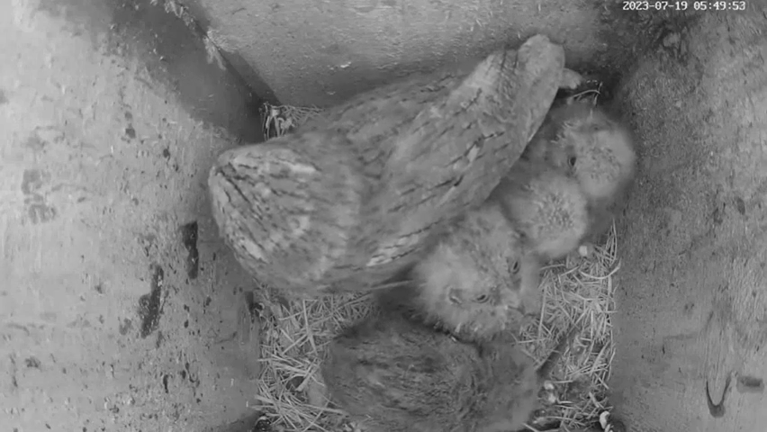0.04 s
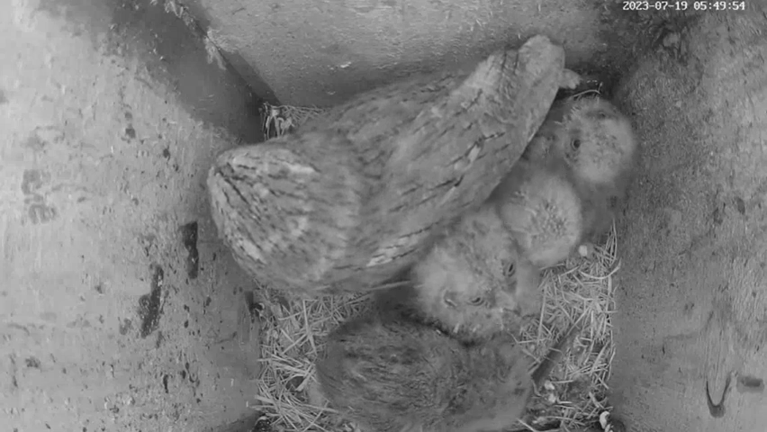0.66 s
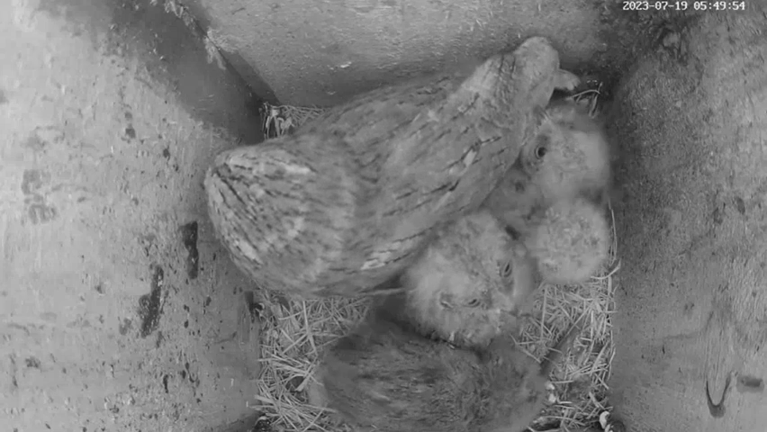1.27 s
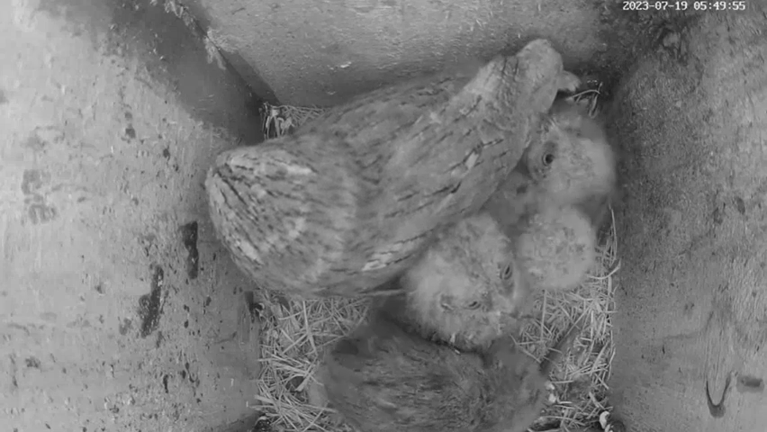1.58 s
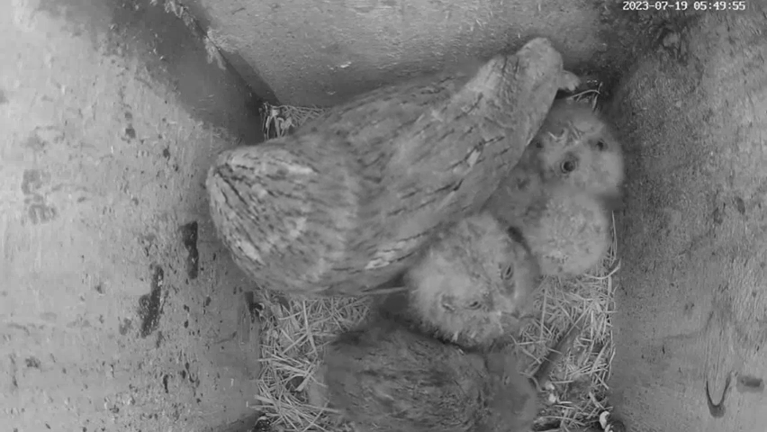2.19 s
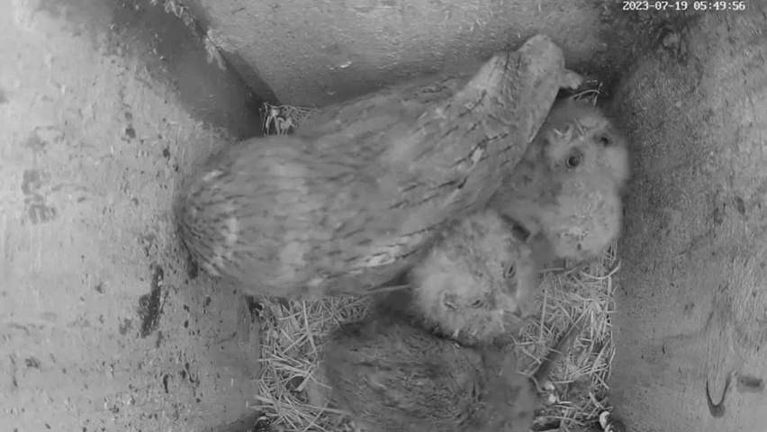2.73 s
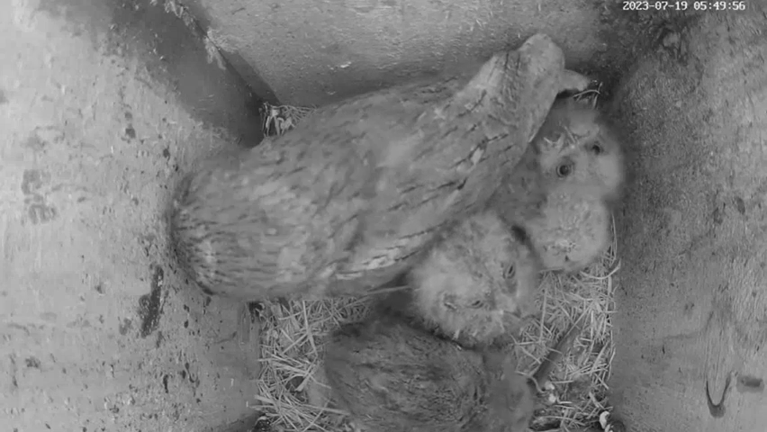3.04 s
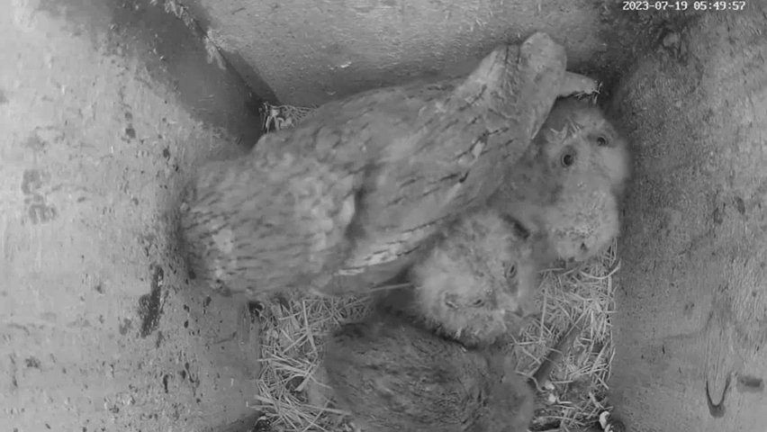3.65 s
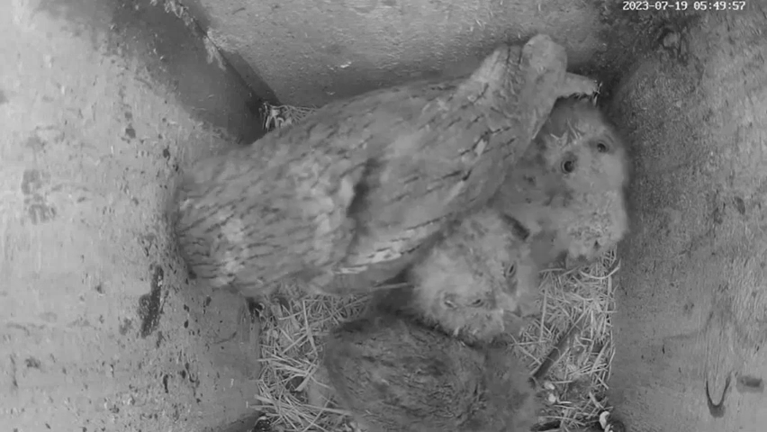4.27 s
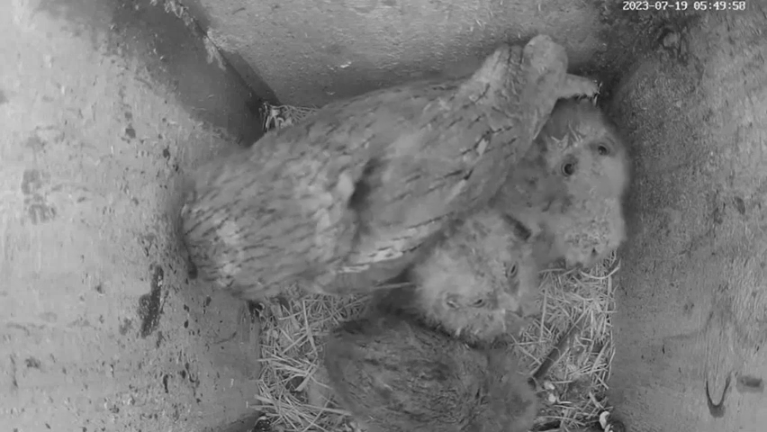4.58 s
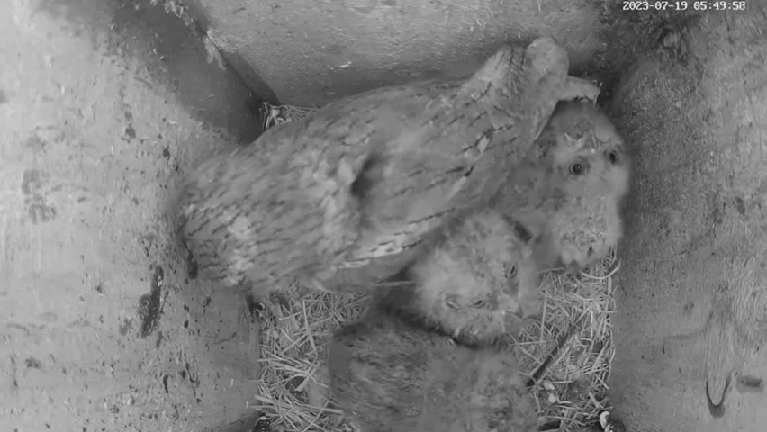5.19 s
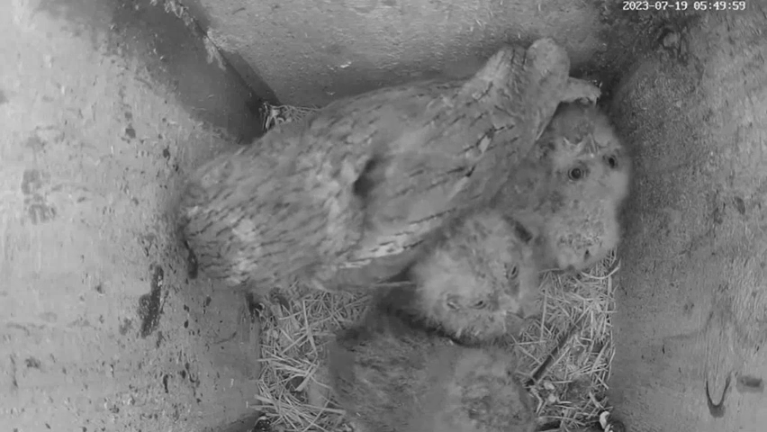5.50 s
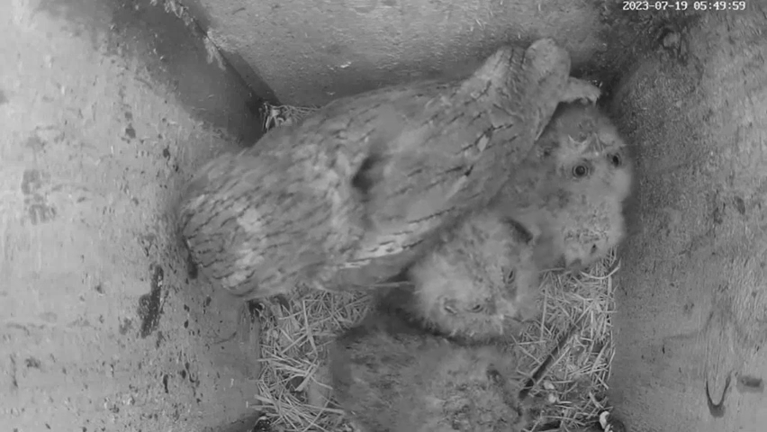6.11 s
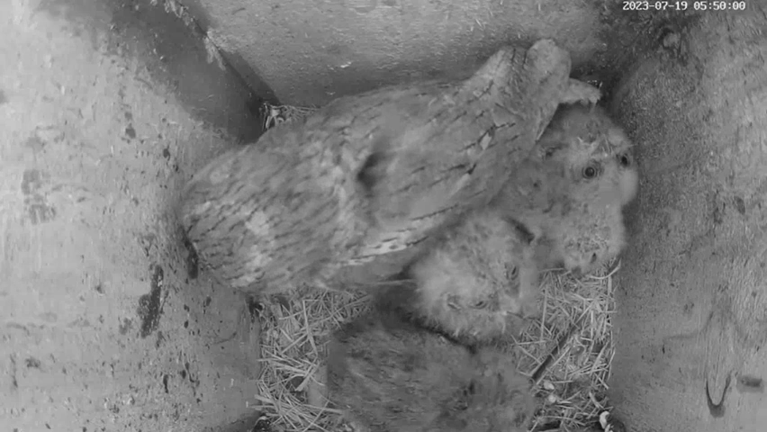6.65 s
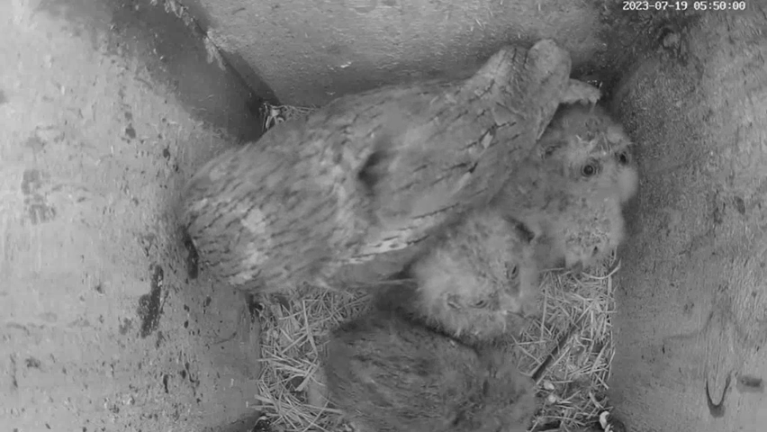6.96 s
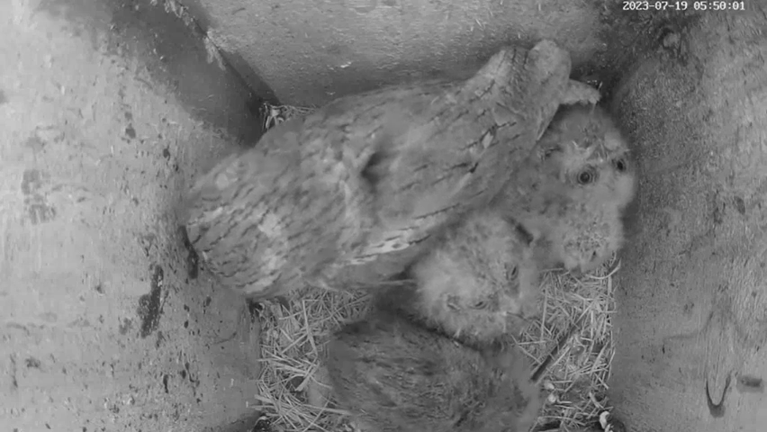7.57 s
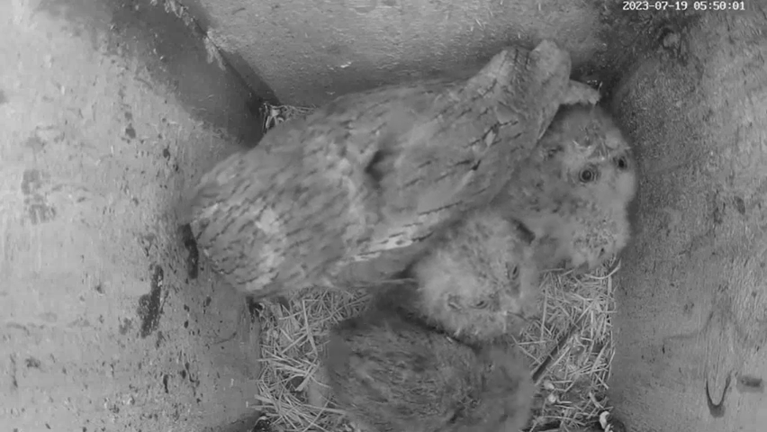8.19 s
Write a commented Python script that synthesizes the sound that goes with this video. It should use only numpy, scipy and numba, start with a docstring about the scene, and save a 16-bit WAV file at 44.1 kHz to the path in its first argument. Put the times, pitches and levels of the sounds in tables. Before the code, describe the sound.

Close inside a wooden nest box, owls step and shuffle on straw, making soft, low thumps through the boards. Chicks give brief raspy calls and thin peeps, two or three at a time, with pauses between the groups. The movement is strongest at first, settles in the middle and returns more lightly while the begging continues. A faint, steady microphone hiss lies underneath.

```python
"""Three owl chicks beg in a wooden nest box, close to a small camera microphone, over faint hiss.
First a gravelly, a shrill and a hoarse chick call in turn: uneven syrinx pulses ring the throat,
often clearing into a peep. Thin whistles arch between calls; steps bump the box, hardest near 1 s.
Two calls follow near 2 s, then the shuffling on the litter dies down. All three beg again from 3.7 s.
The steps pick up, two chicks call from 5.5 s, and a last round of all three starts at 7.3 s."""
import sys
import numpy as np
from scipy import signal
from scipy.fft import rfft, irfft
from scipy.io import wavfile
from scipy.ndimage import uniform_filter1d
from numba import njit

SR = 44100
rng = np.random.default_rng(int(sys.argv[2]) if len(sys.argv) > 2 else 0)


def unload_wav(signal):
    """Save mono or channel-first audio to the path in sys.argv[1] as 16-bit WAV at rate SR, clipped to [-1, 1]."""
    wavfile.write(
        sys.argv[1],
        SR,
        np.round(np.clip(np.atleast_2d(signal).T, -1, 1) * 32767).astype(np.int16),
    )


N = 372644
TIME = np.arange(N) / SR
FREQS = np.maximum(np.arange(N // 2 + 1) * SR / N, 1e-3)


# calls: start t/s, crest t/s, end t/s, crest level/dB, tail re crest/dB, upper modes re crest/dB
GRAVELLY_CALLS = [(0.072, 0.112, 0.1865, -44, -15.5, -5.5), (1.952, 1.990, 2.084, -45.5, -18, -8),
                  (3.717, 3.764, 3.805, -45.5, -20, -8.5), (3.797, 3.812, 3.9, -53, -6.5, -7),
                  (5.519, 5.564, 5.665, -46, -10, -8), (7.266, 7.310, 7.406, -42.5, -12, -10.5)]
# throat modes: f/Hz, width/Hz, level/dB
GRAVELLY_MODES = [(860, 260, 5.5), (1178, 225, 5), (1566, 246, 9.5), (2150, 620, -1), (4100, 1130, 0),
                  (5200, 490, 2), (6270, 150, -4), (8300, 440, -18), (9500, 1100, -18), (12200, 790, -20)]


def gravelly_chick():
    """Slow pulses with little air, so single snaps crackle."""
    return rasps(GRAVELLY_CALLS, GRAVELLY_MODES, pulse_hz=248.2, jitter=.32, scatter_db=2, puff_s=.003,
                 low_air=.5, high_air=3.3, low_db=-1, high_db=-1,
                 squeak_db=2, arch=.024, bite=.21, follow=.63)


# calls and throat modes: columns as for the gravelly chick
SHRILL_CALLS = [(0.530, 0.578, 0.63, -51, -11.5, -1.5), (3.980, 4.030, 4.04, -49, -4, -0.13),
                (7.570, 7.612, 7.662, -49.5, -13, -1.7)]
SHRILL_MODES = [(1130, 2340, 3.5), (2250, 430, 10.5), (2730, 660, -2.5), (3880, 490, 0), (4810, 600, 5.5),
                (6150, 300, -29), (8300, 910, -30), (8960, 350, -16), (12500, 3000, -24)]


def shrill_chick():
    """Fast pulses of equal strength with long puffs of air."""
    return rasps(SHRILL_CALLS, SHRILL_MODES, pulse_hz=468.6, jitter=.33, scatter_db=0, puff_s=.0099,
                 low_air=1.5, high_air=1.3, low_db=1, high_db=-1.5,
                 squeak_db=-1.5, arch=.062, bite=.1, follow=.82)


# calls and throat modes: columns as for the gravelly chick; each call adds its own mode, f/Hz
HOARSE_CALLS = [(0.745, 0.783, 0.852, -45, -18.5, -5, 1950), (2.340, 2.386, 2.448, -49.5, -14.5, -4, 2000),
                (4.350, 4.395, 4.49, -49, -13.5, -7, 1940), (5.640, 5.682, 5.75, -54.5, -10, -7.5, 1830),
                (5.968, 6.014, 6.03, -43, -22, -1, 1670), (7.760, 7.808, 7.872, -49, -8.5, -5.5, 1820)]
HOARSE_MODES = [(825, 490, -4), (2400, 1200, -30), (4090, 340, 6), (5400, 1500, -1), (6210, 470, 4),
                (8250, 1500, -16), (12800, 1800, -19)]


def hoarse_chick():
    """Fast pulses with breathy upper modes; one throat mode shifts from call to call."""
    return rasps(HOARSE_CALLS, HOARSE_MODES, pulse_hz=417.2, jitter=.3, scatter_db=2, puff_s=.0077,
                 low_air=1, high_air=3.2, low_db=0, high_db=0,
                 squeak_db=-.5, arch=.082, bite=.78, follow=.79)


def rasps(calls, modes, pulse_hz, jitter, scatter_db, puff_s, low_air, high_air, low_db, high_db,
          squeak_db, arch, bite, follow, split_hz=3200, lag_s=.0037):
    """Snaps and air ring the throat; the upper modes rise with effort and follow its level late."""
    out = np.zeros(N)
    lower = [mode for mode in modes if mode[0] < split_hz]
    upper = [mode for mode in modes if mode[0] >= split_hz]
    for start, crest, end, crest_db, tail_db, upper_db, *own_hz in calls:
        span = slice(int(start * SR), int(end * SR))
        t = TIME[span]
        push_db = effort_db(t, start, crest, end, tail_db)
        late_db = effort_db(t - lag_s, start, crest, end, tail_db)
        snaps, air = syrinx(len(t), pulse_hz, jitter, scatter_db, puff_s)
        low_drive = snaps + low_air * air
        # neighbouring modes swing in opposite phase
        low = sum((-1) ** k * undb(db) * resonance(low_drive, hz, width)
                  for k, (hz, width, db) in enumerate(lower))
        for hz in own_hz:
            low += undb(3.5) * resonance(low_drive, hz, width_hz=510)
        # a call forced through a wide beak is the most piercing
        bite_db = bite * (crest_db + upper_db + 46)
        pitch_ratio = 1 + arch * (undb(push_db / 2) - .7)
        high = throat_ring(snaps + high_air * air, upper, pitch_ratio, bite_db, squeak_db)
        rasp = undb(low_db + push_db) * steady(low)
        rasp += undb(upper_db + high_db + follow * late_db) * steady(high)
        out[span] += rasp * undb(crest_db) * gate(t, start, end, edge_s=.0039)
    return out


def effort_db(t, start, crest, end, tail_db, catch_s=.014, fall_s=.041, release_s=.0097):
    """The push behind a call: it catches, swells to a crest, falls to a weaker tail and stops."""
    rise_db = np.interp(t, [start, start + catch_s, crest], [-19, -9, 0])
    fall_db = np.interp(t, [crest, crest + fall_s], [0, tail_db])
    release_db = np.interp(t, [end - release_s, end], [0, -11])
    return rise_db + fall_db + release_db


def syrinx(size, pulse_hz, jitter, scatter_db, puff_s):
    """Uneven membrane snaps, and the puff of turbulent air after each."""
    timing, strength = rng.standard_normal((120, 2)).T
    onsets = (np.cumsum(np.exp(jitter * timing)) * SR / pulse_hz).astype(int)
    inside = onsets < size
    snaps = np.zeros(size)
    snaps[onsets[inside]] = undb(scatter_db * np.clip(strength[inside], -1.5, 1.5))
    opening = signal.lfilter([1], [1, -np.exp(-1 / (puff_s * SR))], snaps)
    return unit(snaps), unit(opening * rng.standard_normal(size))


def throat_ring(drive, modes, pitch_ratio, bite_db, squeak_db, drift=.303, beak_hz=6500):
    """Broad modes, weighted near the beak resonance, each with a narrow wandering squeak."""
    out, size = 0, len(drive)
    for hz, width, db in modes:
        broad = resonance(drive, hz * pitch_ratio, width)
        squeak_hz = hz * pitch_ratio + drift * width * walk(70.2, size)
        squeak = resonance(drive, squeak_hz, width_hz=88) * undb(squeak_db + 4.7 * walk(68, size))
        near_beak = max(1 - .92 * abs(np.log2(hz / beak_hz)), 0)
        out += undb(db + bite_db * near_beak) * (broad + squeak)
    return out


# clear notes: start t/s, end t/s, first f/Hz, last f/Hz, level/dB, octave re fundamental/dB
PEEP_NOTES = [(0.5, 0.53, 3300, 3140, -59.5, -12), (0.572, 0.619, 4170, 4110, -54, -15.5),
              (0.616, .668, 4060, 3990, -58, -15), (0.83, 0.843, 4240, 4240, -52, -21),
              (2.031, 2.066, 4220, 4100, -64.5, -12), (2.423, 2.444, 4220, 4120, -57, -27),
              (4.034, 4.055, 5120, 4870, -58, -27), (4.042, 4.118, 4010, 4000, -56, -19),
              (5.641, 5.658, 4200, 4330, -59, -9), (6.048, 6.075, 4170, 4030, -54, -12),
              (7.391, 7.41, 4340, 4300, -60, -14), (7.571, 7.6, 3830, 3840, -61, -24),
              (7.62, 7.645, 5130, 4820, -59, -28), (7.637, 7.707, 4020, 3940, -61.5, -19)]


def peeps(flutter_db=2.5):
    """The membranes briefly swing freely and the rasp clears into a quavering tone."""
    out = np.zeros(N)
    for start, end, first_hz, last_hz, db, octave_db in PEEP_NOTES:
        span = slice(int(start * SR), int(end * SR))
        t = TIME[span]
        glide_hz = np.linspace(first_hz, last_hz, len(t))
        note = tone(glide_hz, octave_db, third_db=octave_db - 10, waver=.007)
        out[span] += note * undb(db + flutter_db * walk(307, len(t))) * gate(t, start, end, edge_s=.0075)
    return out


# arched notes: start t/s, crest t/s, end t/s, crest f/Hz, level/dB, octave re fundamental at crest/dB
WHISTLE_NOTES = [(0.262, 0.376, 0.72, 2094, -75.5, 6), (0.898, 1.06, 1.36, 2235, -68, -1.5),
                 (1.67, 1.857, 2.16, 2140, -74.5, 7), (2.471, 2.639, 3, 2126, -70, 1),
                 (3.439, 3.609, 4, 2114, -73, 5), (4.52, 4.688, 4.94, 2050, -77.5, 9),
                 (5.722, 5.83, 5.97, 1880, -72, 0), (6.463, 6.685, 6.97, 2065, -75, 4),
                 (7.6, 7.77, 8.1, 2123, -71, -0.5)]


def whistles(bend_hz_per_s2=13000, depth_hz=560, gain_db=-2, growth_db_per_s=4, flutter_db=3.2):
    """Faint wavering whistles climb to a crest pitch and sink into a long tail."""
    out = np.zeros(N)
    for start, crest, end, crest_hz, db, octave_db in WHISTLE_NOTES:
        span = slice(int(start * SR), int(end * SR))
        t = TIME[span]
        sag_hz = depth_hz * (1 - np.exp(-bend_hz_per_s2 / depth_hz * (t - crest) ** 2))
        note = tone(crest_hz - sag_hz, octave_db - sag_hz / 80, third_db=-14, waver=.009)
        push_db = growth_db_per_s * (t - crest) + flutter_db * walk(40, len(t))
        out[span] += note * undb(db + gain_db + push_db) * gate(t, start, end, edge_s=.1)
    return out


def tone(hz, octave_db, third_db, waver):
    """A slightly unsteady note with two overtones."""
    phase = 2 * np.pi * np.cumsum(hz * (1 + waver * walk(500, len(hz)))) / SR
    overtones = undb(octave_db) * np.sin(2 * phase) + undb(third_db) * np.sin(3 * phase)
    return np.sqrt(2) * (np.sin(phase) + overtones)


# air modes of the box: f/Hz, width/Hz, level/dB
BOX_MODES = [(469.7, 47, 0), (862, 60, -1), (1173, 53, -17.5), (1696, 56, -5), (2005, 36, -7),
             (2360, 220, -21)]


def box_ring(x):
    """The air in the box rings at its own few frequencies, a hollow sound."""
    return sum(undb(db) * resonance(x, hz, width) for hz, width, db in BOX_MODES)


# steps and nudges against the box: t/s, level/dB, f/Hz
STEPS = [(0.063, -21, 178), (0.082, -29, 183), (0.167, -20, 198), (0.196, -23.5, 210), (0.482, -25, 150),
         (0.505, -21.5, 184), (0.578, -30, 179), (0.639, -23.5, 170), (0.685, -22.5, 217),
         (0.701, -21, 199), (0.752, -18, 207), (0.876, -20, 206), (0.941, -20.5, 220), (0.991, -21.5, 238),
         (1.011, -17, 208), (1.05, -12.5, 203), (1.082, -16, 258), (1.132, -10.5, 217), (1.238, -25.5, 150),
         (1.335, -20.5, 222), (1.354, -20, 182), (1.436, -27, 210), (1.517, -28.5, 217),
         (1.594, -29.5, 240), (1.68, -22, 195), (1.779, -25.5, 219), (1.893, -23, 204), (1.939, -25, 156),
         (1.99, -29.5, 144), (2.109, -28.5, 150), (2.168, -24.5, 114), (2.358, -25.5, 205),
         (2.474, -28.5, 172), (2.607, -29, 158), (2.758, -25.5, 173), (3.06, -34.5, 140),
         (3.644, -35.5, 90), (4.265, -33.5, 101), (4.304, -33.5, 112), (4.667, -32.5, 114),
         (4.825, -32, 130), (5.025, -37.5, 147), (5.143, -36.5, 181), (5.206, -36.5, 132),
         (5.282, -26, 119), (5.325, -29.5, 190), (5.469, -25.5, 149), (5.495, -32, 187), (5.63, -37, 162),
         (5.814, -26.5, 171), (5.91, -29.5, 168), (6.035, -34.5, 138), (6.134, -24, 135), (6.151, -31, 198),
         (6.368, -23, 173), (6.435, -28, 153), (6.455, -25, 140), (6.603, -32, 137), (6.716, -25.5, 110),
         (6.798, -27.5, 124), (6.853, -32.5, 176), (7.049, -28, 122), (7.172, -25.5, 134),
         (7.284, -29, 100), (7.547, -32, 122), (7.621, -31.5, 109), (7.788, -28.5, 127),
         (7.945, -29.5, 173), (8.006, -28, 108), (8.037, -30.5, 206), (8.252, -37, 89), (8.358, -32, 148)]


def bumps(lean_rad=1.85, softness=3.29, half_s=.04):
    """A soft blow pushes the damped boards out and back once."""
    out = np.zeros(N)
    for at, db, hz in STEPS:
        span = slice(max(int((at - half_s) * SR), 0), int((at + half_s) * SR))
        scaled_time = 2 * np.pi * hz * (TIME[span] - at) / (softness - .5)
        push = np.real(np.exp(1j * lean_rad) / (1 - 1j * scaled_time) ** softness)
        out[span] += undb(db) * push * np.hanning(len(push))
    return out


# restlessness of the owls: t/s, level/dB
RESTLESSNESS = [(0.0, -36), (0.28, -40.5), (1.2, -36), (1.88, -41.5), (2.19, -50), (2.61, -40),
                (2.77, -53.5), (3.27, -58.5), (4.59, -54.5), (5.36, -49), (5.58, -49), (6.24, -44),
                (7.11, -46), (7.29, -51.5), (7.53, -50), (7.86, -46.5), (8.05, -54), (8.45, -43.5)]
# moments of holding still: t/s
STILL_MOMENTS = [0.12, 0.395, 0.81, 1.17, 1.732, 2.04, 4.73, 5.545, 5.98, 6.64, 8.305]
# spectra of the litter through the wood: f/Hz, level/dB
RUMBLE_SPECTRUM = [(12, -55.5), (25, 7.5), (55, 8.5), (100, 8), (170, 6), (240, -14.5), (330, -29),
                   (600, -73)]
SCRAPE_SPECTRUM = [(120, -8.5), (220, 7.5), (320, 0), (420, -3.5), (550, -16.5), (750, -21), (1200, -57)]


def shuffle(slips_per_s=380, scatter_db=2.5, give_s=.02, settle_s=.024, pause_s=.017, pause_db=-11.5):
    """Feet and feathers slip on the litter, heard through the wood; harder moves scrape more."""
    level_db = np.interp(TIME, *np.transpose(RESTLESSNESS)) + 1.5
    rumble_power = undb(level_db) ** 2
    scrape_power = rumble_power * undb(level_db + 26) ** 2
    # the litter gives way before each step and settles after it
    for at, db, hz in STEPS:
        span = slice(max(int((at - .1) * SR), 0), int((at + .2) * SR))
        t = TIME[span] - at
        stir = undb(min(db - 10, -33)) * np.exp(np.minimum(t / give_s, -t / settle_s))
        scrape_db = -12 + 14.5 * np.log2(hz / 170)
        rumble_power[span] += stir ** 2
        scrape_power[span] += (stir * undb(scrape_db)) ** 2
    sizes = undb(scatter_db * np.minimum(rng.exponential(size=N), 3)) * rng.choice([-1, 1], N)
    slips = sizes * (rng.random(N) < slips_per_s / SR)
    rumble = undb(-1.5) * np.sqrt(rumble_power) * colour(slips, RUMBLE_SPECTRUM)
    scrape = np.sqrt(scrape_power) * colour(slips, SCRAPE_SPECTRUM)
    stillness = sum(np.exp(-((TIME - at) / pause_s) ** 2) for at in STILL_MOMENTS)
    return undb(pause_db * stillness) * (rumble + scrape)


# straw ticks and claw squeaks: centre t/s, length/s, f/Hz, width/Hz, level/dB
STRAW_AND_CLAWS = [(0.173, .022, 473, 129, -36.5), (2.275, 0.035, 1770, 1500, -63.5),
                   (2.467, 0.032, 1500, 1270, -55), (3.935, 0.023, 6050, 700, -69.5),
                   (4.251, 0.0064, 1900, 1200, -58.5), (4.8, 0.034, 590, 200, -51.5),
                   (5.028, 0.013, 2200, 5970, -58.5), (5.506, 0.011, 3000, 12000, -59),
                   (6.252, .014, 1760, 800, -60.5), (6.843, 0.04, 600, 170, -54.5)]


def scratches():
    """Straw and claws scratch in short bursts of band noise."""
    out = np.zeros(N)
    for at, length, hz, width, db in STRAW_AND_CLAWS:
        span = slice(int((at - length / 2) * SR), int((at + length / 2) * SR))
        size = span.stop - span.start
        out[span] += undb(db) * np.hanning(size) * unit(resonance(rng.standard_normal(size), hz, width))
    return out


# microphone hiss: f/Hz, level/dB
HISS_SPECTRUM = [(30, 18.5), (150, -5), (300, 8.5), (700, 4.5), (1100, 1.5), (2000, -2), (2900, -2),
                 (4100, 2.5), (5100, -4), (5900, -8), (8000, -10.5), (14000, -13)]


def background(hiss_db=-64, air_db=-70):
    """Microphone hiss, and faint outside noise ringing the air in the box."""
    hiss = colour(rng.standard_normal(N), HISS_SPECTRUM)
    air = unit(box_ring(rng.standard_normal(N)))
    return undb(hiss_db) * hiss + undb(air_db) * air


def undb(db):
    """Decibels to gain."""
    return 10 ** (np.asarray(db) / 20)


def unit(x):
    """Scale to rms 1."""
    return x / np.sqrt(np.mean(x ** 2) + 1e-18)


def steady(x):
    """Hold the 25 ms rms near 1, keeping single pulses."""
    power = np.abs(uniform_filter1d(x ** 2, size=SR // 40))
    return x / np.sqrt(power + 1e-3 * np.mean(x ** 2))


def colour(x, points):
    """Filter by (f/Hz, level/dB) points; rms 1."""
    hz, db = np.transpose(points)
    gain = undb(np.interp(np.log(FREQS), np.log(hz), db))
    return unit(irfft(rfft(x) * gain, N))


def walk(rate_hz, size):
    """Smooth random wander, spread near 1."""
    hold = max(int(SR / rate_hz), 1)
    stairs = np.repeat(rng.standard_normal(size // hold + 1), hold)
    return 1.54 * uniform_filter1d(stairs, hold)[:size]


def gate(t, start, end, edge_s):
    """Open and close with sine-squared edges."""
    return np.sin(np.pi / 2 * np.clip(np.minimum(t - start, end - t) / edge_s, 0, 1)) ** 2


def resonance(x, hz, width_hz):
    """Two band-passes in series."""
    centre_hz = hz * np.ones(len(x))
    return band(band(x, centre_hz, float(width_hz)), centre_hz, float(width_hz))


@njit
def band(x, hz, width_hz):
    """State-variable band-pass with a movable centre."""
    out, band_state, low_state = np.empty(len(x)), 0., 0.
    for i in range(len(x)):
        g = np.tan(np.pi * min(hz[i], .45 * SR) / SR)
        damping = width_hz / hz[i]
        passed = (band_state + g * (x[i] - low_state)) / (1 + g * (g + damping))
        band_state = 2 * passed - band_state
        low_state += 2 * g * passed
        out[i] = damping * passed
    return out


def scene():
    """Voices, their ring in the box, movement and hiss at one microphone."""
    voices = gravelly_chick() + shrill_chick() + hoarse_chick() + peeps() + whistles()
    ring = undb(-6) * box_ring(voices)
    return (voices + ring + bumps() + shuffle() + scratches() + background())[None]


def record(dry):
    """The camera cuts the top of the treble."""
    cutoff_hz = 14180
    return signal.sosfilt(signal.ellip(10, .2, 70, cutoff_hz, fs=SR, output="sos"), dry)


dry = scene()
out = record(dry)
unload_wav(out)
```